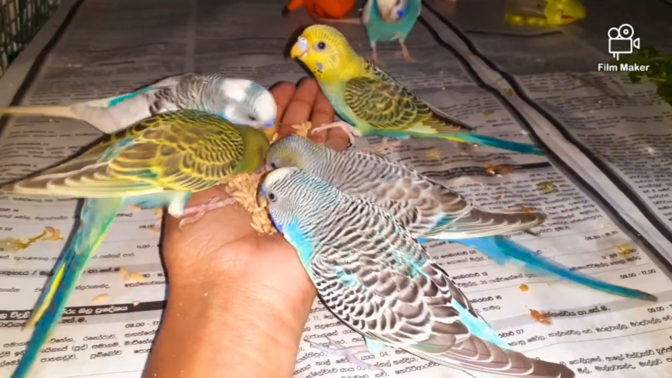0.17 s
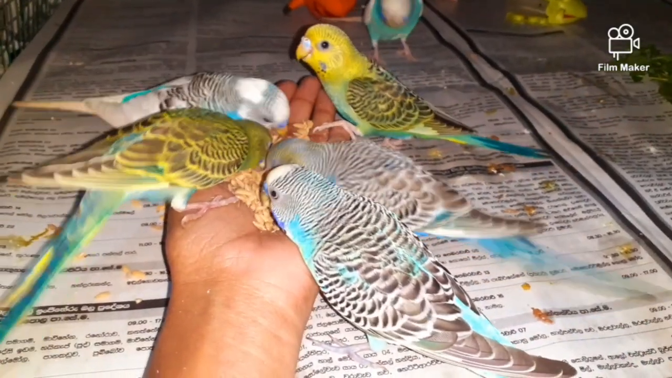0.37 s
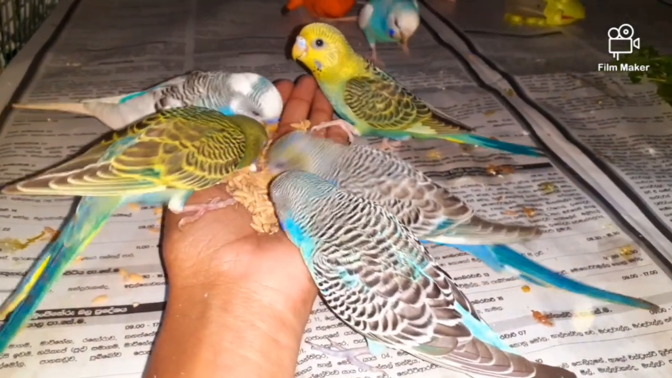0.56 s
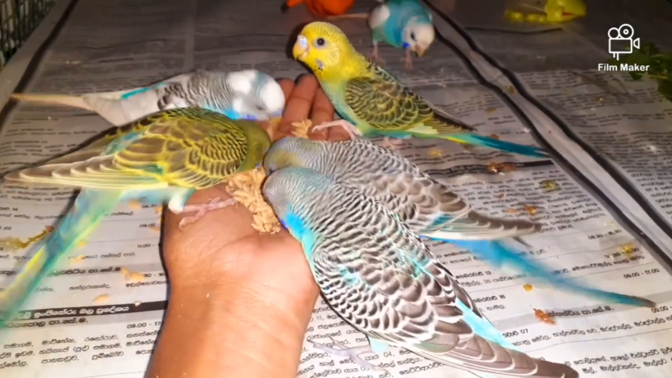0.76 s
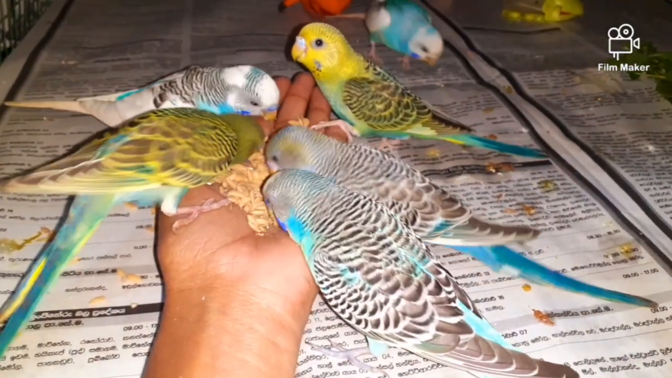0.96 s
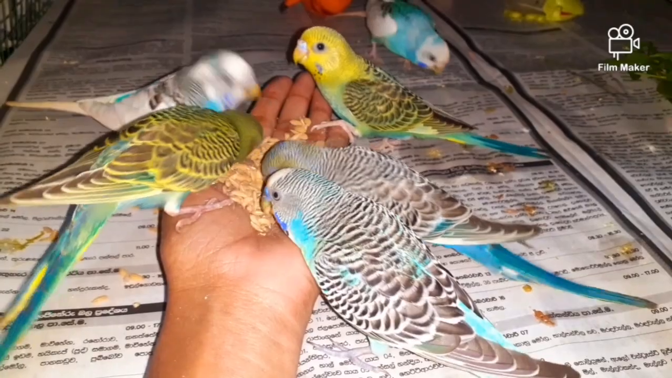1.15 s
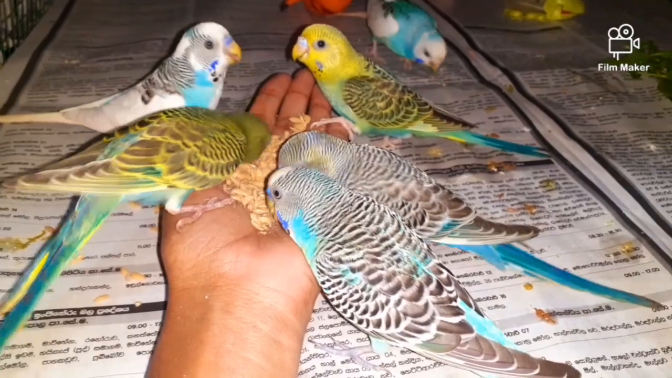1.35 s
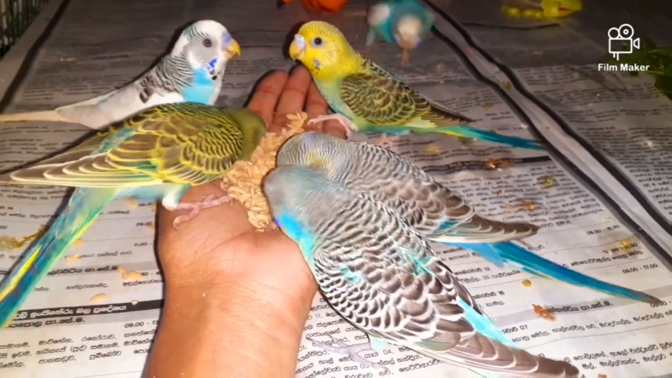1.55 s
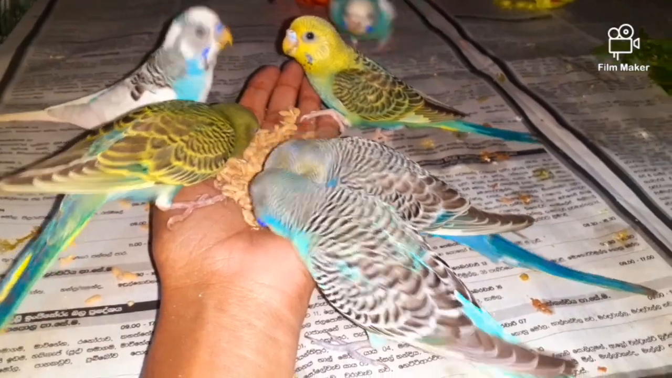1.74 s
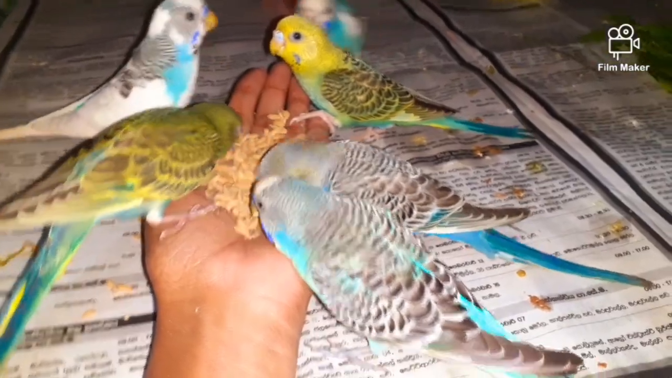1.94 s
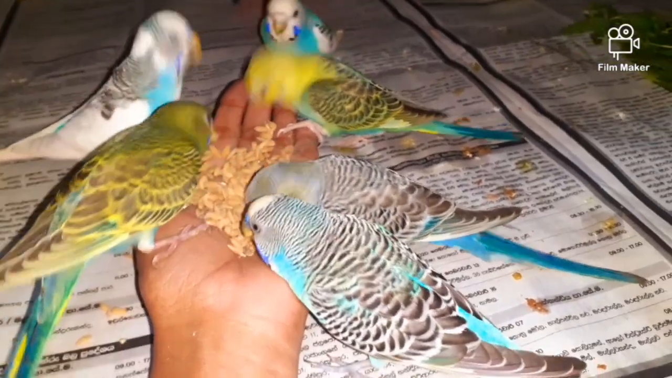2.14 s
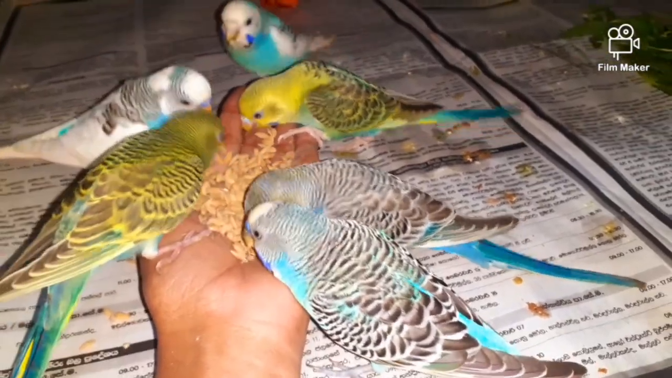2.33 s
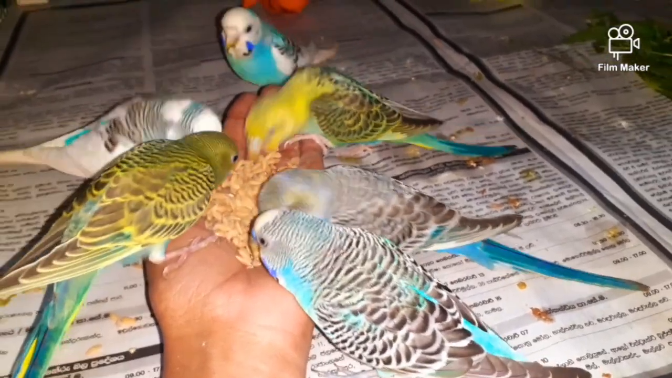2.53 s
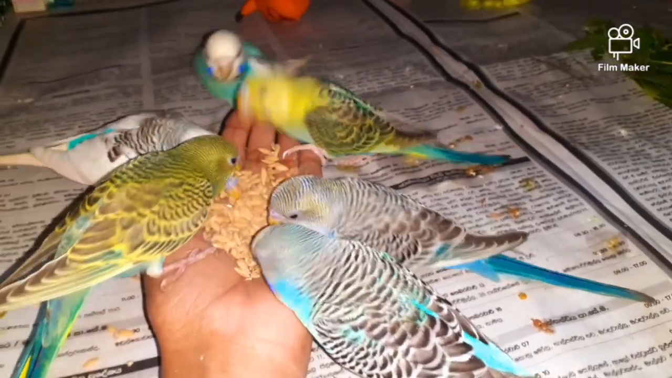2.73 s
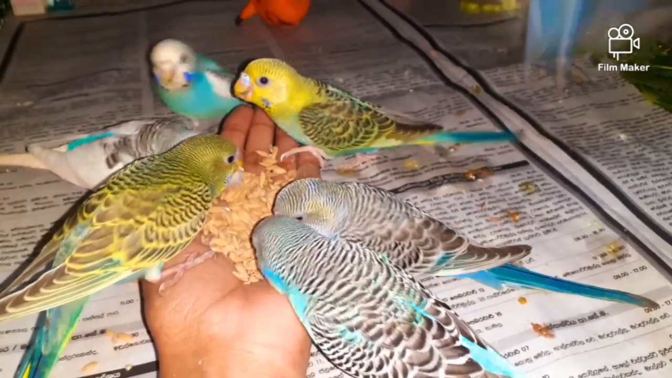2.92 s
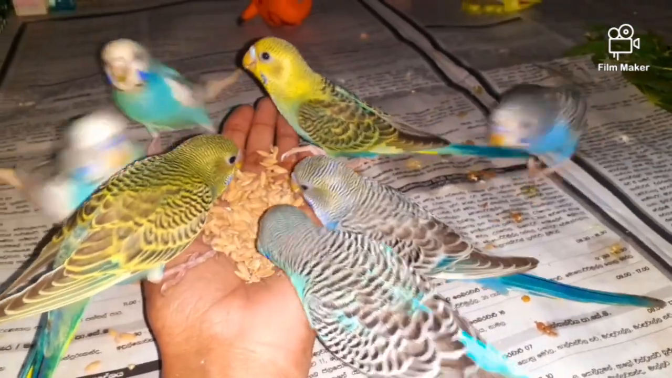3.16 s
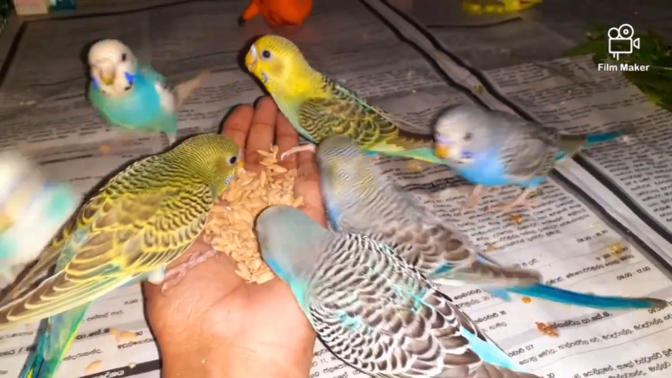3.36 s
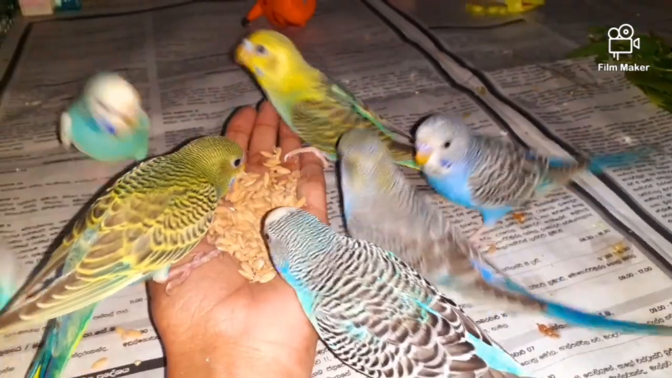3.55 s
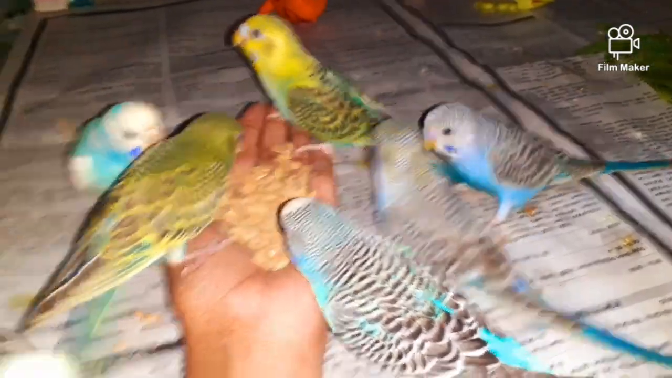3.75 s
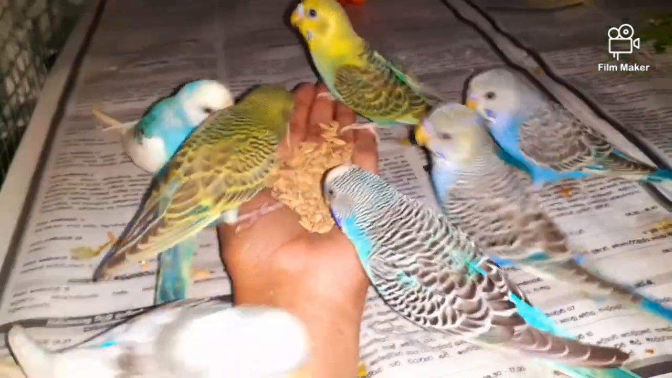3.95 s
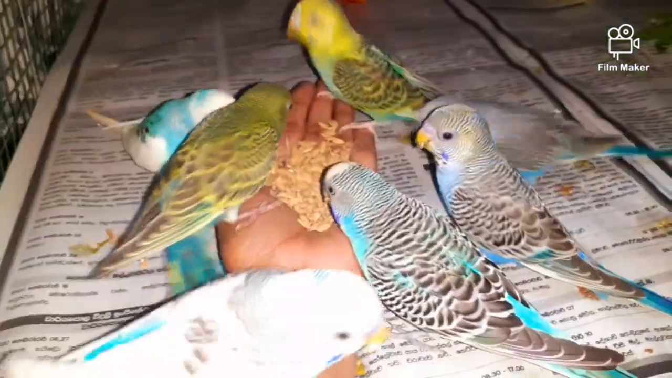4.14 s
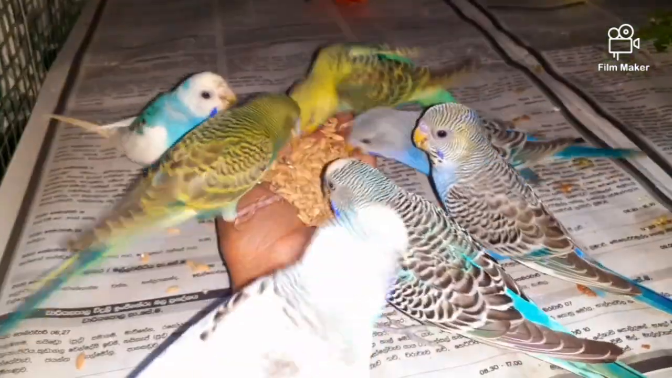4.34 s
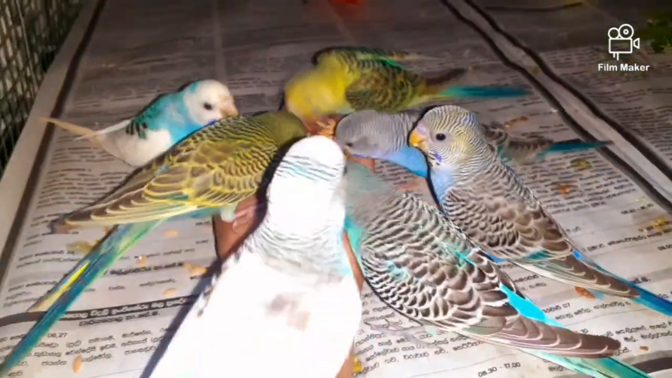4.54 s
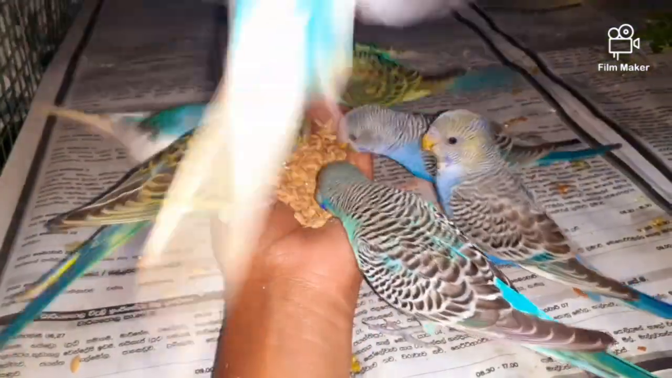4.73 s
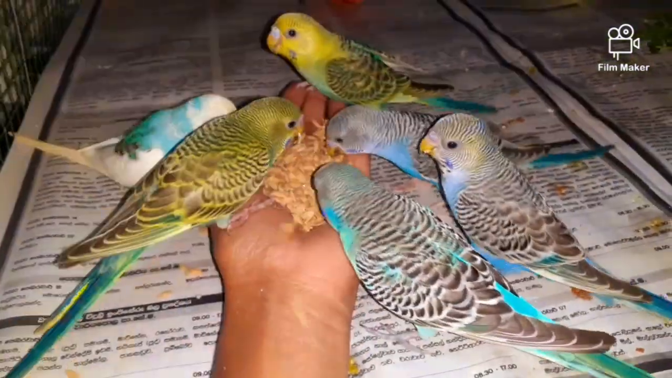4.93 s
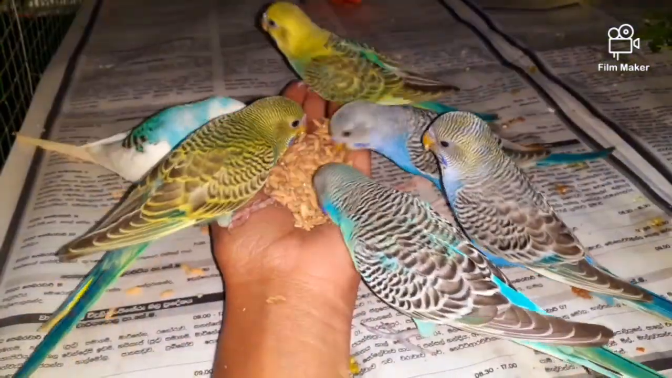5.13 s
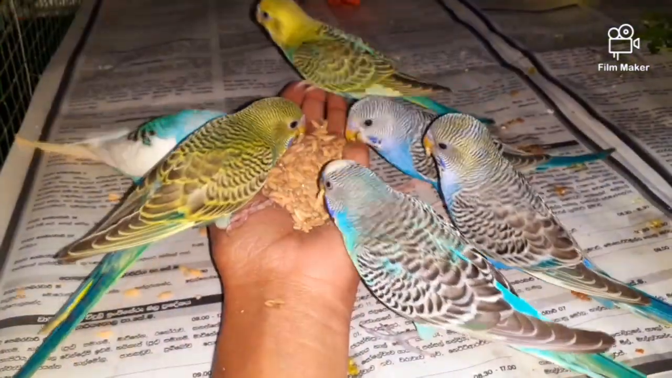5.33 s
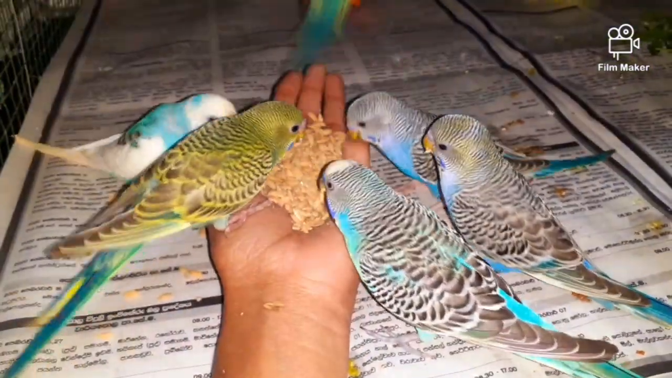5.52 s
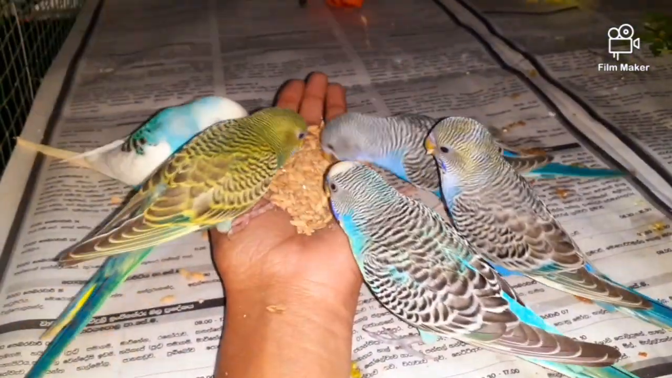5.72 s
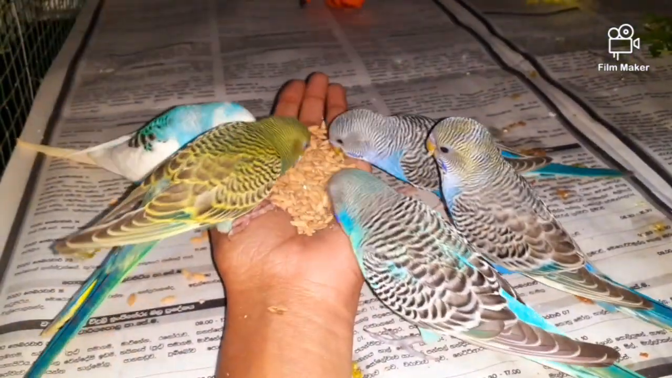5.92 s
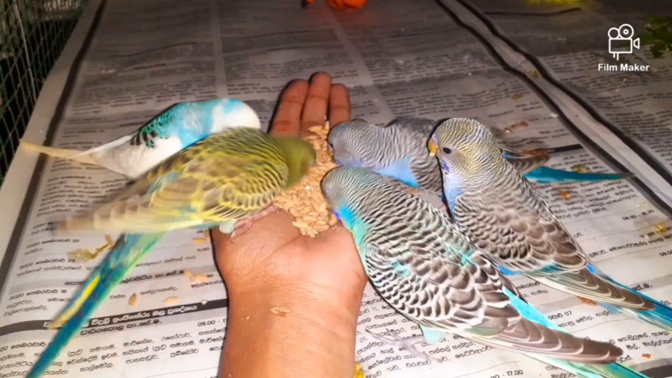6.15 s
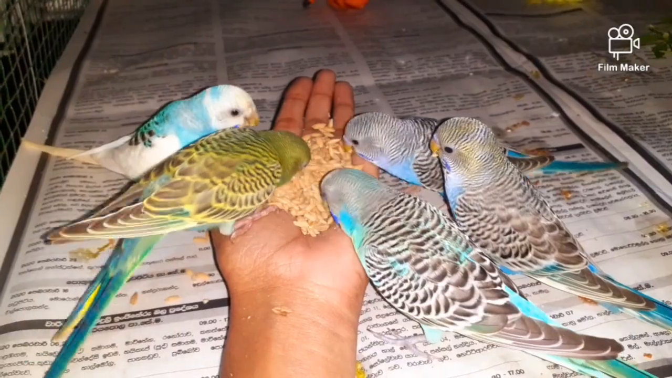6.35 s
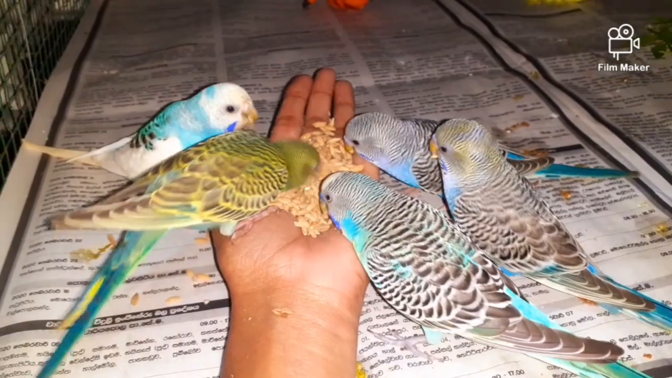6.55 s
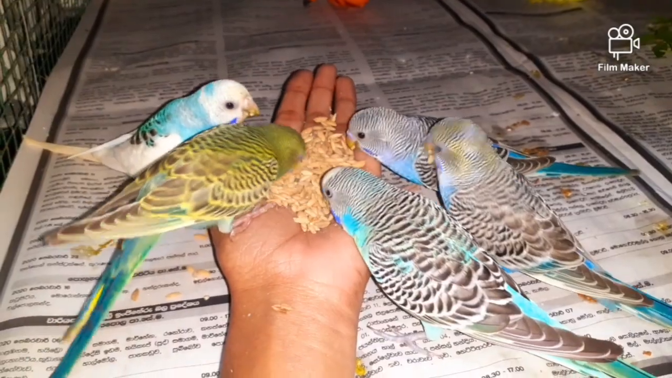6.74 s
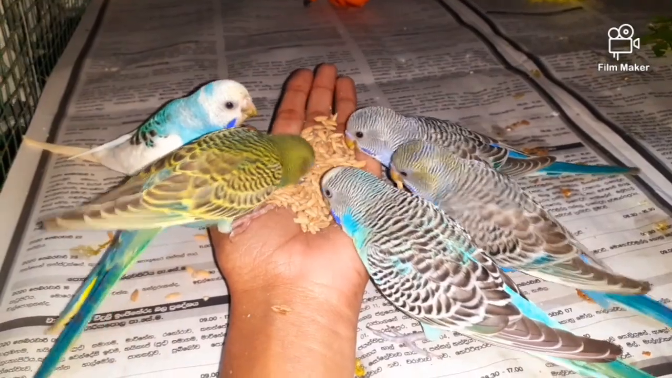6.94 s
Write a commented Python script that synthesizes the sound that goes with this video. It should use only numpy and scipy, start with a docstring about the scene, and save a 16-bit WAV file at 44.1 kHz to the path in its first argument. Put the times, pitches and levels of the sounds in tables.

```python
"""A seed husk cracks sharply, then budgies go on cracking seed in a hand and shuffling on newspaper, close to a phone.
Husk clicks and rough bursts (claw scuffs, some chirp onsets, a take-off, landing flaps) are noise ringing a
coloured body; noise also gives the faint rustle and palm rubbing. A few very short, hoarse chirps are fast arches
of pitch. Now and then a bird flies past or flutters down: beating noise makes its whoosh and feather hiss, short
falling swings of air its thumps. The small hard-walled room answers with a noise tail over a low hum."""
import sys
import numpy as np
from scipy import signal
from scipy.fft import rfft, irfft, next_fast_len
from scipy.io import wavfile
from scipy.ndimage import uniform_filter1d, map_coordinates

SR = 44100
rng = np.random.default_rng(int(sys.argv[2]) if len(sys.argv) > 2 else 0)


def output_pcm(signal):
    """Save a mono or channel-first signal as 16-bit PCM at the path in sys.argv[1].

    Samples are clipped to [-1, 1] before scaling.
    """
    pcm = np.clip(np.atleast_2d(signal).T, -1, 1) * 32767
    wavfile.write(sys.argv[1], SR, np.round(pcm).astype(np.int16))


N = 307818  # samples


def amp(db):
    """Decibels to gain."""
    return 10 ** (np.asarray(db) / 20)


def unit(x):
    """Scale to rms 1."""
    return x / np.sqrt(np.mean(x ** 2) + 1e-20)


def unit_energy(x):
    """Scale to energy 1, over both ports together."""
    return x / np.linalg.norm(x)


def along(points, hz):
    """Read (f/Hz, value) points on a log frequency axis."""
    f, value = np.transpose(points)
    return np.interp(np.log(hz + 1), np.log(f), value)


def noise_pair(length):
    """Two unrelated white noises, one for each port."""
    return rng.standard_normal((2, length))


def wobble(rate):
    """A smooth random curve, rate knots a second."""
    knots = rng.standard_normal(int(N * rate / SR) + 4)
    return map_coordinates(knots, [np.arange(N) * rate / SR])


def swell(t, start, end, rise, fade):
    """Gain that rises to 1 at start, holds until end and fades; slopes in dB per s."""
    return amp(-rise * np.maximum(start - t, 0) - fade * np.maximum(t - end, 0))


def filtered(x, response):
    """x times a response of frequency."""
    size = next_fast_len(x.shape[-1] + SR // 2)
    spectrum = rfft(x, size) * response(np.fft.rfftfreq(size, 1 / SR))
    return irfft(spectrum, size)[..., :x.shape[-1]]


def causal(level_db, size=1024):
    """The minimum-phase impulse response, of energy 1, of a body with this dB response."""
    cepstrum = irfft(np.log(amp(level_db(np.fft.rfftfreq(size, 1 / SR)))))
    # fold the cepstrum forward in time, so that nothing rings before the blow
    cepstrum[1:size // 2] *= 2
    cepstrum[size // 2 + 1:] = 0
    return unit_energy(irfft(np.exp(rfft(cepstrum))))


def add(track, s, sound):
    """Mix a sound into a track from time s."""
    start = max(round(s * SR), 0)
    part = track[..., start:start + sound.shape[-1]]
    part += sound[..., :part.shape[-1]]


# likeness of diffuse sound at the two microphone ports: f/Hz, correlation
PORT_LIKENESS = [(60, 0.74), (300, 0.78), (650, 0.49), (1400, 0.065), (15000, 0)]


def diffuse(pair, spectrum):
    """Colour two unrelated noises to rms 1; the ports hear much the same bass but different treble."""
    def mid_side(hz):
        turn = np.arccos(np.clip(along(PORT_LIKENESS, hz), -1, 1)) / 2
        return amp(along(spectrum, hz)) * np.array([np.cos(turn), np.sin(turn)])

    mid, side = filtered(pair, mid_side)
    return unit(np.array([mid + side, mid - side]))


def from_front(x, lag):
    """Direct sound reaches the right port lag seconds after the left."""
    delays = np.array([[0], [lag]])
    return filtered(np.array([x, x]), lambda hz: np.exp(-2j * np.pi * hz * delays))


def patchy(depth_db, order, size):
    """Two noises whose gain drifts in patches, size bands wide and order frames long."""
    z = signal.stft(noise_pair(N), nperseg=1024)[2]
    across_bands = uniform_filter1d(rng.standard_normal(z.shape[1:]), size, axis=0)
    field = uniform_filter1d(across_bands, order, axis=1)
    return signal.istft(z * amp(depth_db * unit(field)), nperseg=1024)[1][:, :N]


# the low drone of the room and its thin hiss: f/Hz, level/dB per Hz
HUM_SPECTRUM = [(25, -35.5), (60, -10), (100, -1), (160, -16.5), (245, -7), (275, -16.5), (300, 7),
                (325, -9), (350, -5), (420, -13), (600, -18), (1100, -28), (4000, -26.5), (16000, -23.5)]


def hum():
    """The room's low, slightly restless drone with a thin hiss, as slowly wavering noise."""
    return amp(-73.0 + 0.31 * wobble(2.1)) * diffuse(noise_pair(N), HUM_SPECTRUM)


# how long the small room rings: f/Hz, t60/s
ROOM_DECAY = [(100, 0.12), (500, 0.63), (2700, 0.19), (6000, 0.32), (15000, 0.26)]
# colour of the hard walls' answer: f/Hz, level/dB
WALL_COLOUR = [(100, 4), (1200, -3.5), (2200, 2), (2800, 0), (3350, -1.5), (4200, -2), (5600, -4),
               (7000, -3.5), (10000, -5), (15000, -5.5)]


def room(x):
    """Hard walls answer with a noise tail that lasts longest near 500 Hz and builds up over some 6 ms."""
    hz, t, z = signal.stft(noise_pair(SR // 2), SR, nperseg=256)
    decay = amp(-60 * t / along(ROOM_DECAY, hz)[:, None])
    tail = diffuse(signal.istft(z * decay, SR, nperseg=256)[1], WALL_COLOUR)
    tail = tail * (1 - np.exp(-np.arange(tail.shape[1]) / SR / .006))
    return signal.fftconvolve(x, tail / np.linalg.norm(tail[0]), axes=1)[:, :N]


# spells in which the flock shifts its feet: t/s, length/s, rustle level/dB, palm rubbing level/dB
FOOT_SHIFTS = [(0, 0.087, -65.5, -87), (1.537, 0.38, -83.5, -72.5), (1.945, 0.19, -67.5, -80),
               (2.756, 0.34, -66, -70), (3.16, .33, -61.5, -69.5), (3.6, .1, -65.5, -61),
               (3.888, 0.16, -62.5, -72.5), (4.178, 0.17, -65, -67), (4.5, 0.065, -64, -63),
               (4.964, 0.29, -58.5, -67), (5.579, 0.3, -59, -68), (6.225, 0.0303, -68, -52.5)]
JOSTLE_RISE_DB_PER_S, JOSTLE_FADE_DB_PER_S = 202, 104
CALM_DB = -69.5  # rustle gain of quiet feeding


def jostling():
    """Gains of the rustle and of the rubbing on the palm: each spell adds its power to the calm feeding."""
    t = np.arange(N) / SR
    rustle, rubbing = np.full(N, amp(CALM_DB) ** 2), np.zeros(N)
    for s, length, rustle_db, rubbing_db in FOOT_SHIFTS:
        spell = swell(t, s, s + length, JOSTLE_RISE_DB_PER_S, JOSTLE_FADE_DB_PER_S)
        rustle += (amp(rustle_db) * spell) ** 2
        rubbing += (amp(rubbing_db) * spell) ** 2
    return np.sqrt(rustle), np.sqrt(rubbing)


# dull rubbing of feet on the palm: f/Hz, level/dB per Hz
PALM_SPECTRUM = [(40, -15), (100, -15), (160, -13.5), (230, -4.5), (330, 2), (450, -12), (700, -16),
                 (1500, -26)]


def shuffling(level):
    """Shifting feet make a soft, dull rubbing on the palm: low noise with a drifting colour."""
    return level * diffuse(patchy(depth_db=2.0, order=4, size=2), PALM_SPECTRUM)


# faint husk ticks, feet and feathers: f/Hz, level/dB per Hz
RUSTLE_SPECTRUM = [(500, -21.5), (1200, -11), (1800, -2.5), (2200, -7), (2750, 2), (3300, -13), (4000, 1),
                   (5000, -7), (6200, -1), (10000, -7.5), (13000, -4), (16000, -9.5)]


def nibbling(level, count=420):
    """Many faint husk ticks, each a decaying grain of noise, over the fitful rustle of feet and feathers."""
    ticks, t = np.zeros((2, N)), np.arange(SR // 20) / SR
    for when, size, life in rng.random((count, 3)):
        t60 = 0.0068 + 0.062 * life
        grain = noise_pair(len(t)) * amp(-60 * t / t60)
        add(ticks, when * N / SR, amp(13 * size ** 2) * grain)
    fitful = amp(1.5 * wobble(25) + 1.5 * wobble(250))
    rustle = patchy(depth_db=2.5, order=4, size=24) * fitful
    return level * (amp(-3.5) * diffuse(ticks, RUSTLE_SPECTRUM) + amp(-5) * diffuse(rustle, RUSTLE_SPECTRUM))


def thump(hz, slowing=0.008):
    """A downstroke shoves a short swing of air past the phone, falling in pitch as the wing slows; centred in 50 ms."""
    t = np.arange(-SR // 40, SR // 40) / SR
    phase = 2 * np.pi * hz * slowing * (1 - np.exp(-t / slowing))
    return -np.exp(-(t / np.where(t < 0, .007, .009)) ** 2) * np.cos(phase)


# flights past the phone: t/s of the nearest wing stroke, wingbeat period/s,
# full effort before it/s, full effort after it/s, rise/dB per s, fade/dB per s,
# whoosh base level/dB, feather hiss base level/dB, its treble level/dB, thump level/dB,
# thump centre f/Hz, moving air at the left port over the right level/dB
FLYPASTS = [(2.966, 0.056, 0.035, 0.047, 170, 200, -49.5, -53.5, -4.5, -34.5, 103, 1),
            (4.8215, .052, 0.11, .25, 1201.5, 103.5, -43, -44, -2.5, -23, 113.4, 4.5),
            (5.553, .0535, 0.042, .14, 1300, 140, -46, -51, -4.5, -31, 152, 3.5),
            (6.235, 0.051, 0.24, 0.029, 42, 250, -52.5, -57.5, -3.5, -54.5, 148, 1)]
# eddies, beating vanes and hissing feathers, each: f/Hz, level/dB per Hz
EDDY_SPECTRUM = [(18, -39.5), (30, -9), (48, 5), (91, 0.5), (129, -0.5), (260, -4), (312, 2), (379, -11),
                 (526, -6.5), (673, -14), (832, -16), (1500, -31), (1950, -49), (3300, -120)]
VANE_SPECTRUM = [(200, -26), (340, -8), (460, 1.5), (620, -6.5), (850, -11), (1300, -19), (2200, -18.5),
                 (3500, -42.5)]
FEATHER_SPECTRUM = [(400, -18), (1200, 1), (2400, 1.5), (3500, -2), (6000, -4.5), (9500, -4.5), (11500, -9),
                    (16000, -3)]
THUMP_APPROACH_DB_PER_S, THUMP_RECEDE_DB_PER_S = 105.5, 52.5  # the air push carries only a short way
THUMP_SCATTER = 0.046  # log pitch spread: no two strokes have quite the same pitch
WHOOSH_NEAR_DB, NEAR_S = 4, 0.04  # the eddies swell around the nearest stroke
WHOOSH_BEAT_DB, FLAP_BEAT_DB, FEATHER_BEAT_DB = 1.8, 1.5, 1.34  # swing either way within each wingbeat
FLAP_DB, FLAP_ROUGH_DB = -7, 5  # flaps relative to the whoosh base level; uneven flutter
FEATHER_SAG_DB_PER_S = 21  # the first strokes of a flight are the hardest
FEATHER_TREBLE_HZ = 3380  # each flight sets its own hiss level above this


def wings():
    """Steady wingbeats: every stroke thumps the air, flaps the vanes and swells the eddies and feather hiss."""
    out, t = np.zeros((2, N)), np.arange(N) / SR
    eddies = diffuse(patchy(depth_db=5, order=3, size=2), EDDY_SPECTRUM)
    vanes = diffuse(amp(FLAP_ROUGH_DB * wobble(90)) * noise_pair(N), VANE_SPECTRUM)
    grit = amp(3 * wobble(400) + 2 * wobble(60))
    feathers = diffuse(grit * noise_pair(N), FEATHER_SPECTRUM)
    dull = filtered(feathers, lambda hz: 1 / (1 + (hz / FEATHER_TREBLE_HZ) ** 4))
    for (s, period, before, after, rise, fade, whoosh_db, feather_db, treble_db,
         thump_db, thump_hz, pan_db) in FLYPASTS:
        effort = swell(t, s - before, s + after, rise, fade)
        beat = np.cos(2 * np.pi * (t - s) / period)
        near = np.exp(-((t - s) / NEAR_S) ** 2)
        whoosh = amp(whoosh_db + WHOOSH_BEAT_DB * beat + WHOOSH_NEAR_DB * near) * eddies
        flaps = amp(whoosh_db + FLAP_DB + FLAP_BEAT_DB * beat) * vanes
        sag_db = FEATHER_SAG_DB_PER_S * np.maximum(t - s + before, 0)
        plumage = dull + amp(treble_db) * (feathers - dull)
        hiss = amp(feather_db + FEATHER_BEAT_DB * beat - sag_db) * plumage
        thumps = np.zeros(N)
        for stroke in s + period * np.arange(-8, 9):
            closeness = swell(stroke, s, s, THUMP_APPROACH_DB_PER_S, THUMP_RECEDE_DB_PER_S)
            stroke_hz = thump_hz * np.exp(THUMP_SCATTER * rng.standard_normal())
            push = amp(thump_db) * closeness * thump(stroke_hz)
            add(thumps, stroke - len(push) / SR / 2, push)
        moving_air = (whoosh + thumps) * amp(pan_db * np.array([[.5], [-.5]]))
        out += effort * (hiss + flaps + moving_air)
    return out


# chirps: t/s at the top of the arch, top f/Hz, rise/s, fall/s, level/dB, octave level/dB,
# hoarseness level/dB, low start level/dB
CALLS = [(3.1232, 3600, 0.0094, 0.014, -42, -21, -16, -8), (3.375, 3970, 0.014, 0.019, -43, -17, -25, -5.5),
         (3.579, 2986, .015, .0053, -46.5, -16, -6, -1.5),
         (3.6503, 2928, .0165, 0.014, -33.5, -15, -18.5, -5.5),
         (4.685, 2970, .004, 0.005, -44, -13.5, -7, -9), (4.698, 2901, 0.015, 0.013, -24, -4.5, -12, -33.5),
         (4.757, 2947, .017, 0.0085, -22.5, 2.5, -6, -15.5)]
# hoarse breath in the call: f/Hz, level/dB per Hz
RASP_SPECTRUM = [(300, -15), (1000, -22.5), (1400, -20), (2200, 4.5), (2800, 6), (3400, -19.5), (4300, 5.5),
                 (5800, -14.5), (7200, -11.5), (8700, -6), (10500, -18), (16000, -24)]


def chirps():
    """Each chirp is one fast arch of pitch: an unsteady start near 1 kHz, a steadier top, a quick fall, with rasp."""
    out, t = np.zeros((2, N)), np.arange(-SR // 20, SR // 20) / SR
    for s, top_hz, rise, fall, db, octave_db, hoarse_db, start_db in CALLS:
        reach = t / np.where(t < 0, rise, fall)  # -1 at the start, 0 at the top, 1 at the end
        effort = 1 / (1 + (reach / .55) ** 4)
        smooth = uniform_filter1d(noise_pair(len(t)), size=36)
        pitch_flutter, level_flutter = unit(smooth[0]), unit(smooth[1])
        edge_hz = np.where(t < 0, 950, 0.67 * top_hz)
        arch = (1 - np.minimum(np.abs(reach), 1) ** 1.4) ** 1.5
        pitch = edge_hz + (top_hz - edge_hz) * arch
        unsteadiness = 0.032 + 0.085 * (1 - effort)
        phase = 2 * np.pi * np.cumsum(pitch * (1 + unsteadiness * pitch_flutter)) / SR
        low_start = amp(start_db) * (1 - effort) * (t < 0)
        fundamental = (effort ** 3 + low_start) * np.sin(phase)
        overtones = effort * (amp(octave_db) * np.sin(2 * phase) + amp(-16.0) * np.sin(3 * phase))
        tone = from_front((fundamental + overtones) * amp(2 * level_flutter), lag=0.00019)
        rasp = amp(hoarse_db) * effort * diffuse(noise_pair(len(t)), RASP_SPECTRUM)
        opening = np.clip((1 - np.abs(reach)) * 20, 0, 1)
        add(out, s + t[0], amp(db) * opening * (tone + rasp))
    return out


HUSK_RING_WIDTH = .13  # half-width of the ring's dB peak, as a share of its pitch


def contact(force, spectrum, snap_db, knock_db, ring_hz=2700, ring_db=0):
    """A force scaled to energy 1 rings a body; the snap lifts or cuts its treble, the knock its bass."""
    tilt = [(2200, knock_db), (4000, 0.0096), (7500, 0.004), (12000, snap_db)]
    ring = lambda hz: ring_db / (1 + ((hz - ring_hz) / (HUSK_RING_WIDTH * ring_hz)) ** 2)
    body = causal(lambda hz: along(spectrum, hz) + along(tilt, hz) + ring(hz))
    return signal.fftconvolve(unit_energy(force), body[None], axes=1)


# rough bursts: claws scuffing paper, the noisy onsets of some chirps (near 3.6 s),
# an abrupt take-off (5.506 s) and the wing flaps of a landing bird (6.115 and 6.228 s):
# t/s, level/dB, snap above 9 kHz level/dB, knock below 3 kHz level/dB, t60/s
BURSTS = [(0.223, -29, 5, -5, 0.04), (0.6575, -35, 13, -2, 0.095), (1.3755, -27.5, 5.5, -11, 0.12),
          (1.401, -25, 15, -2.5, 0.093), (1.9432, -25, 2.5, -10, 0.094), (2.3082, -24.5, 16, -12, 0.025),
          (2.4381, -29.5, -10, -12, 0.033), (2.8396, -25.5, -7, -2.5, 0.064), (3.0222, -12, 0.5, -6, 0.094),
          (3.111, -22.5, -3.5, 6, 0.08), (3.1631, -17.5, -2, -8, 0.033), (3.186, -22.5, 4, -11, .06),
          (3.3018, -22, 2, -8.5, 0.051), (3.3485, -16.5, 4.5, 3, 0.15), (3.4437, -20.5, 2.5, -5, 0.076),
          (3.5633, -13.5, -8, 0.5, 0.073), (3.576, -14, 4, 0, 0.034), (3.634, -11, 0, 1.5, 0.067),
          (3.8846, -15.5, 0.5, -9.5, 0.04), (3.92, -17, 3, -3.5, 0.039), (5.506, -32, 8, 3, .07),
          (6.115, -19, 13, 11.5, 0.11), (6.228, -22.5, 10.5, 19, 0.087)]
# their common papery colour: f/Hz, level/dB per Hz
BURST_SPECTRUM = [(200, -27), (900, -3), (1400, -4.5), (2400, 0.5), (4000, -1.5), (6500, -3.5),
                  (10000, -12), (16000, -12.5)]
BURST_ONSET = 0.017  # rise time constant as a share of t60


def rough_bursts():
    """Scuffs, chirp onsets and flaps alike: a decaying run of uneven noise grains; longer ones start more softly."""
    out, t = np.zeros((2, N)), np.arange(SR // 5) / SR
    for s, db, snap_db, knock_db, t60 in BURSTS:
        grains = noise_pair(len(t)) * amp(4.5 * rng.standard_normal(len(t)))
        force = grains * amp(-60 * t / t60) * (1 - np.exp(-t / (BURST_ONSET * t60)))
        add(out, s, amp(db) * contact(force, BURST_SPECTRUM, snap_db, knock_db))
    return out


# beak clicks: t/s, level/dB, ring f/Hz, snap above 9 kHz level/dB, knock below 3 kHz level/dB
BEAK_CLICKS = [(0.0249, -13, 5850, -4, -5.5), (.4873, -20, 2800, -7.5, -15), (0.586, -29, 2680, 4, -16),
               (0.8797, -26.5, 2170, -5.5, -4), (1.09, -21.5, 2670, -10, -3), (1.43, -32.5, 2640, -10.5, 4),
               (1.58, -29.5, 7800, 0, -3), (1.7763, -25, 13540, -3.5, -24),
               (1.8467, -25.5, 3600, -14, -10.5), (2.189, -29, 13600, 17, -26.5),
               (2.2903, -29, 4320, -15, -9), (2.5092, -21.5, 4000, -11, -12.5),
               (2.5692, -23, 6060, -1.5, -32), (2.724, -21.5, 13600, 2, -2),
               (2.775, -18.5, 13330, 16, -7.5), (2.8757, -22, 13600, -8, -5),
               (3.1173, -18.5, 3330, 6.5, -7.5), (3.2901, -21.5, 4100, -12.5, -11.5),
               (3.6826, -11.5, 3860, -11, -10), (3.7675, -26.5, 9020, -9, -15),
               (3.7708, -15, 3820, -19.5, -9.5), (3.8195, -24.5, 4050, -2, 1),
               (3.852, -22.5, 4340, 0.5, -7), (4.156, -29, 4160, -5.5, -15), (4.2903, -25.5, 2700, -3.5, 1),
               (4.4826, -22.5, 2600, -1.5, -5), (5.3432, -30, 2530, -3.5, -8),
               (5.8075, -22, 14000, 0.5, -4), (5.923, -27, 13300, 4, -19), (6.4505, -19.5, 13700, -5.5, -7),
               (6.5316, -22, 14600, -1.5, -31), (6.8169, -21, 6040, -10.5, -20.5),
               (6.9645, -19.5, 14300, 9.5, 3.5)]
# the seed husk's colour: f/Hz, level/dB per Hz
HUSK_SPECTRUM = [(200, -30), (700, -7), (1300, -6.5), (2400, 3.5), (3300, -4), (4200, -4), (6500, -6.5),
                 (10000, -2.5), (16000, 2.5)]
RATTLE_T60_S, HUSK_RING_DB = 0.029, 8.5  # the same for every click
TICK_SHARE, CRACK_SHARE, RATTLE_SHARE = 0.28, .85, 1  # relative amplitudes within a beak click


def pecks():
    """A husk cracks with one sharp tick at its own pitch, and the seeds around it rattle briefly."""
    out, t = np.zeros((2, N)), np.arange(SR // 10) / SR
    for s, db, ring_hz, snap_db, knock_db in BEAK_CLICKS:
        rattle = unit_energy(noise_pair(len(t)) * amp(-60 * t / RATTLE_T60_S))
        crack = unit_energy(noise_pair(len(t)) * amp(-60 * t / .004))
        tick = from_front(1. * (t == 0), lag=.0004)
        force = TICK_SHARE * tick + CRACK_SHARE * crack + RATTLE_SHARE * rattle
        add(out, s, amp(db) * contact(force, HUSK_SPECTRUM, snap_db, knock_db, ring_hz, HUSK_RING_DB))
    return out


CLOSE_WET_DB, CALL_WET_DB, FLIGHT_WET_DB = -8.5, -11, -17  # how strongly the room answers


def scene():
    """The feeding, calling and flying birds in their room."""
    close, calls, flight = pecks() + rough_bursts(), chirps(), wings()
    echo = room(amp(CLOSE_WET_DB) * close + amp(CALL_WET_DB) * calls + amp(FLIGHT_WET_DB) * flight)
    rustle, rubbing = jostling()
    background = hum() + shuffling(rubbing) + nibbling(rustle)
    return background + echo + flight + calls + close


# colour of the two microphone ports: f/Hz, left minus right level/dB
PORT_BALANCE = [(80, -5.5), (300, -7.5), (700, -5.5), (1300, -4.5), (2500, -9), (4400, -5.5), (6500, -5),
                (10000, -2), (15000, 2)]
TOP_HZ = 15900  # band limit


def record(dry):
    """Each port has its own colour; the deepest bass is cut and nothing passes above the band limit."""
    low_cut = lambda hz: hz ** 4 / (hz ** 4 + 42 ** 4)
    port_gain = lambda hz: amp(along(PORT_BALANCE, hz) * np.array([[.5], [-.5]]))
    return filtered(dry, lambda hz: port_gain(hz) * low_cut(hz) * (hz < TOP_HZ))


dry = scene()
out = record(dry)
output_pcm(out)
```